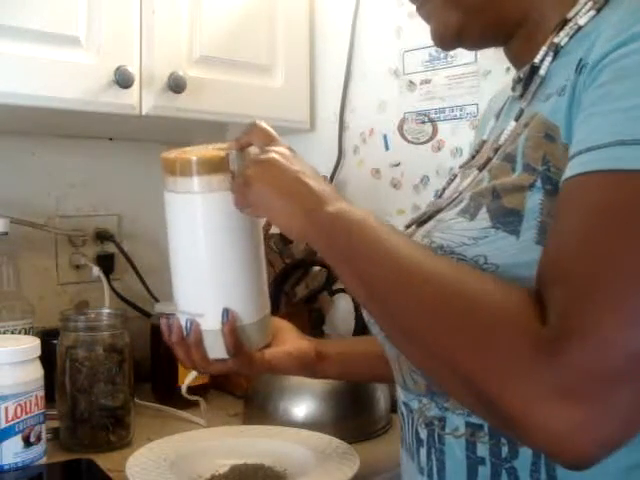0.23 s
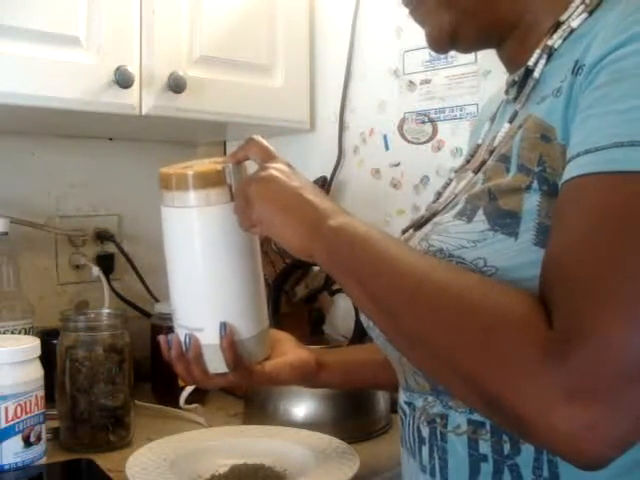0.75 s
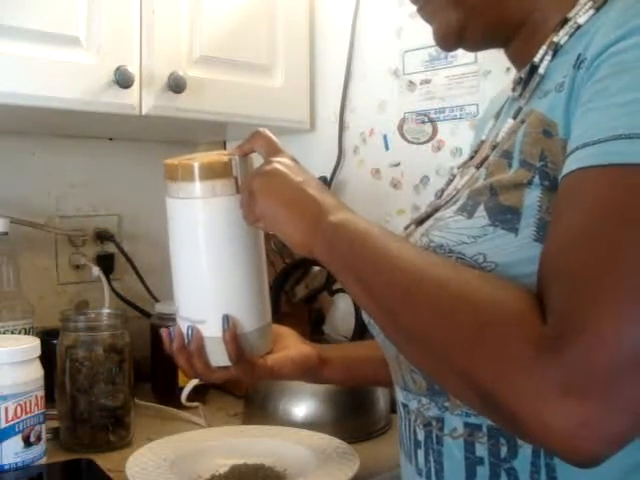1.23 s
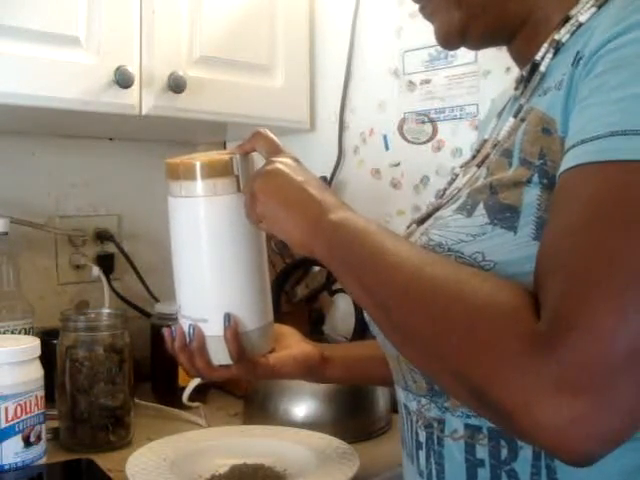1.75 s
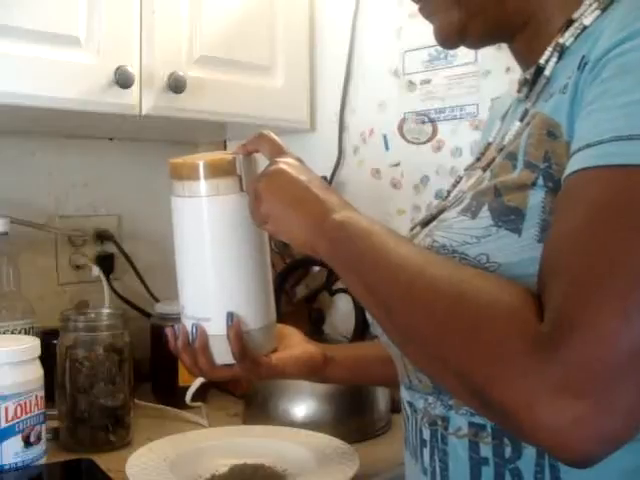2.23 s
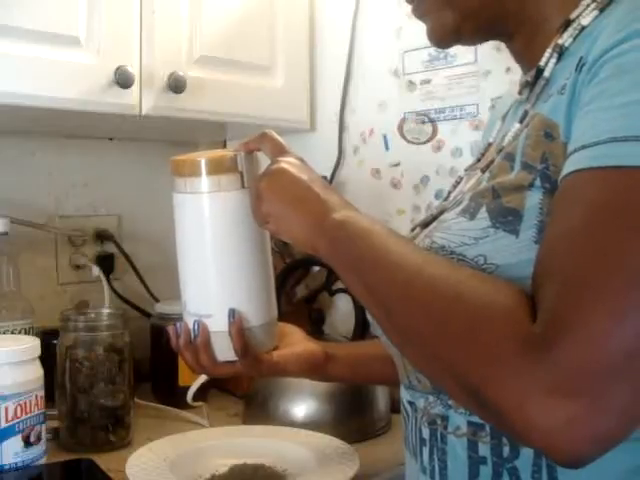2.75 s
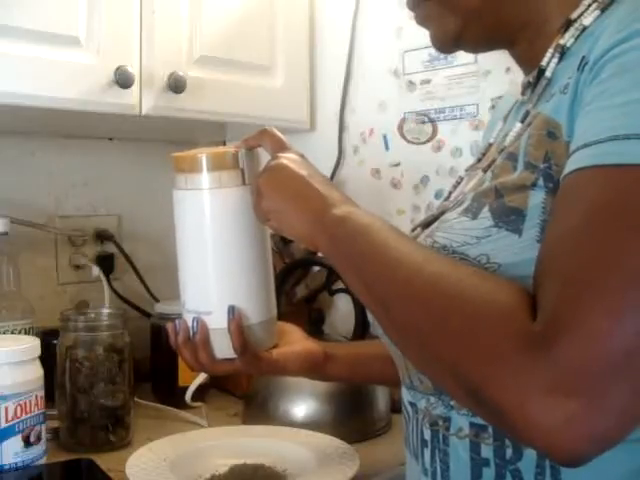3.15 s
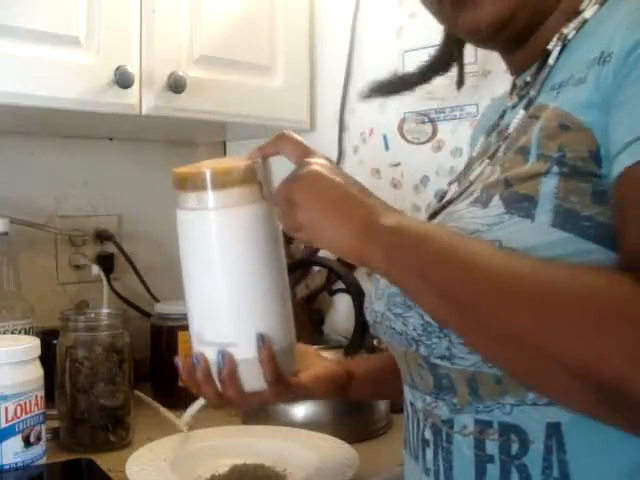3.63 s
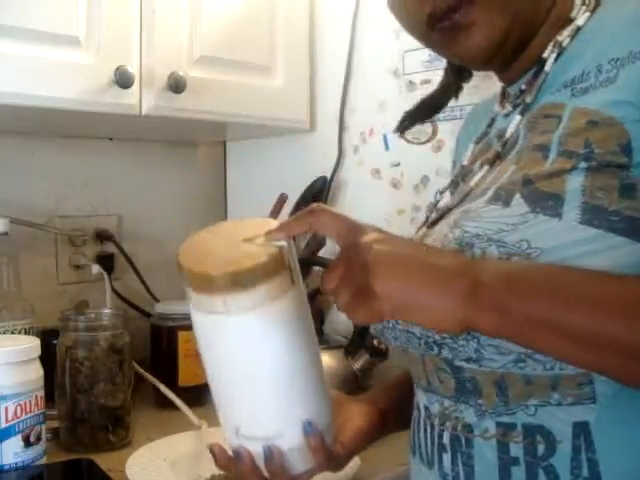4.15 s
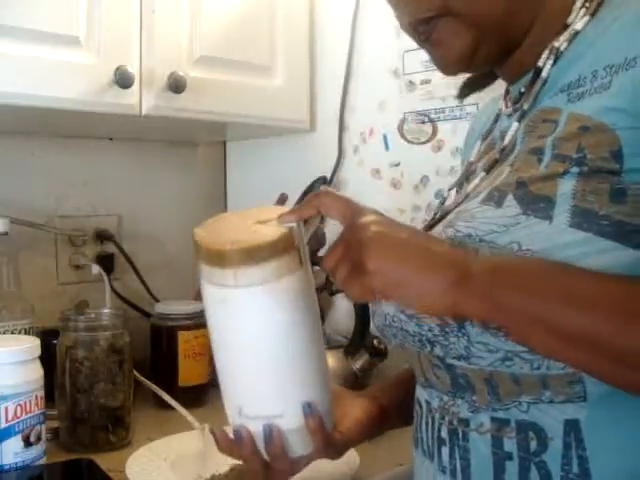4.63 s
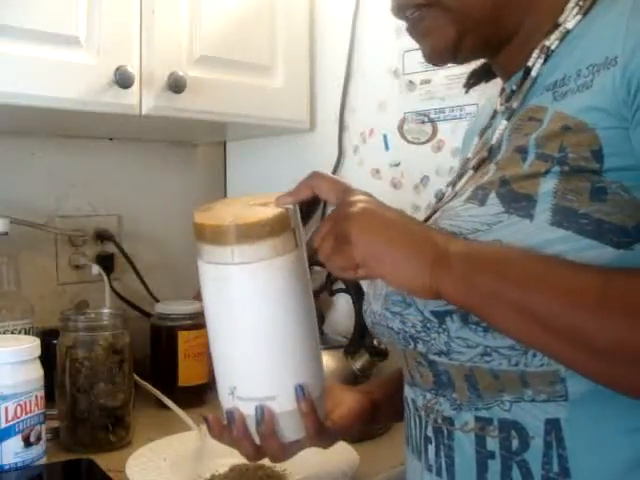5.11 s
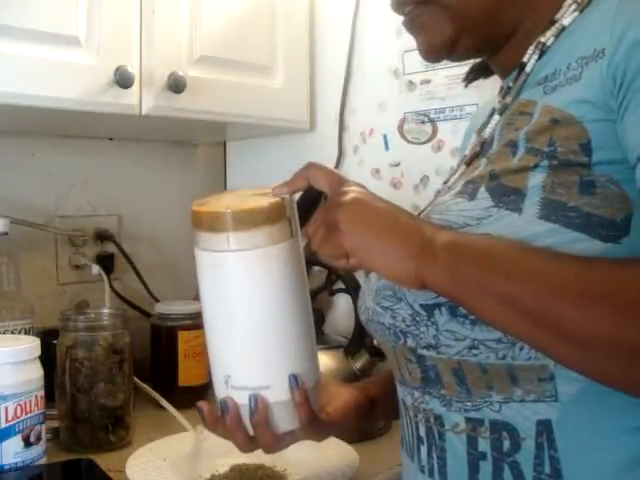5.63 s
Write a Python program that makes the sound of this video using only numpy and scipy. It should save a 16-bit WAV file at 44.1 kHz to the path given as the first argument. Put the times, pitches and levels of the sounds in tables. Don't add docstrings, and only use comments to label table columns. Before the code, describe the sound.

A hand-held electric blade grinder runs throughout, close to one microphone in a small kitchen. It is already whirring at 0 s, slightly under speed, and climbs gently to a steady pitch by about 1.2 s. The tone is a dense, nasal, buzzing whine with a fundamental near 350 Hz and strong overtones, roughened by small wavers. Under it, fine seeds hiss and tick against the steel cup in uneven clumps, with heavier bits rattling the housing and a sharp knock near 0.35 s. At about 3.6 s the button is let go: the whine slides down smoothly, overtones swelling and fading, with a quick cluster of hard knocks around 3.8 s. At 3.9 s power returns and the pitch swoops up, recovering by about 4.6 s amid clacks and dull thumps. Tilted, it continues brighter and slightly higher until cut off near 5.9 s. Room echo is short, treble limited, with faint rumble.

```python
import sys
import numpy as np
from scipy import signal
from scipy.fft import rfft, irfft, next_fast_len
from scipy.io import wavfile
from scipy.ndimage import uniform_filter1d, map_coordinates

SR = 44100
rng = np.random.default_rng(int(sys.argv[2]) if len(sys.argv) > 2 else 0)


def magnitude_from_level(level_db):
    exponent = np.asarray(level_db, float) / 20
    return 10 ** exponent


def store_wav(level_fs):
    pcm = np.round(np.clip(np.atleast_2d(level_fs), -1, 1) * 32767)
    wavfile.write(sys.argv[1], SR, pcm.T.astype(np.int16))


N = 259066

# (time [s], tilt [0-1], button [0-1])
HAND = [
    (0, .4, 1),
    (.8, 0, 0.73),
    (3.52, 0.02, 0.96),
    (3.58, 0.14, 0.25),
    (3.91, 0.04, 0),
    (3.95, 0.4, 0.6),
    (4.6, 0.74, 1),
    (5.0, 1, 1),
    (5.9, 1, 0.96),
]
# (frequency [Hz], level [dB])
ROOM_HUM = [(20, -1.5), (45, -2.5), (110, 8.5), (200, 9.5), (300, -13), (600, -52.5)]
LET_GO_S, PRESSED_S = 3.583, 3.921
FULL_SPEED_HZ = 350


def motor():
    # (order [1], lower mains line [dB], order level [dB], upper mains line [dB])
    upright = [(1, -62, -27.5, -82), (2, -51.5, -35.5, -45), (3, -48.5, -40.5, -40.5), (4, -45, -38, -47),
               (5, -54.5, -41, -39), (6, -40.5, -47.0, -51.5), (7, -62, -42.5, -41.5), (8, -59.5, -41, -48),
               (9, -54, -41.5, -55.5), (10, -49.5, -46.5, -52), (11, -61, -57, -42.5),
               (12, -44.5, -42.5, -49.5), (13, -54.5, -72.5, -57), (14, -53, -44.5, -46.5)]
    # (order [1], lower mains line [dB], order level [dB], upper mains line [dB])
    tilted = [(1, -54, -26.5, -76), (2, -57.5, -40.8, -57), (3, -47.5, -41, -40.5), (4, -38.5, -41.5, -38),
              (5, -39, -44, -41), (6, -40, -43, -47), (7, -58, -44.5, -44), (8, -41, -43, -44.5),
              (9, -38.5, -36.5, -44), (10, -50, -53, -46.5), (11, -49, -37.5, -43), (12, -55, -38.5, -51),
              (13, -50.5, -53, -46), (14, -58.5, -50, -43.5)]
    # (time [s], shift of the standing waves [%], looseness [dB])
    grip = [(0, 0.36, 0.5), (0.3, -0.068, 1), (0.55, 0.068, -3.5), (0.7, -0.01, 3.5), (1, -0.092, 1.9),
            (1.5, 0.24, -0.1), (2.2, -0.061, 0.3), (2.9, 0.33, 3.0), (3.3, 0.16, -0.3), (3.42, 0.44, 2.5),
            (3.53, -0.22, -3.5), (3.6, -0.0055, -1.4), (3.66, -0.18, 3), (3.76, 0.71, -7.5),
            (4.2, 0.17, 2.5), (4.7, -0.12, 0.5), (5.1, 0.072, 1), (5.87, 0.33, -1.2)]
    feels_grip = {4: 1, 5: .5, 6: 1, 7: 1, 8: 1, 9: .5}
    mains_pull_hz, commutator_bars = 120, 20
    high_order_share = 0.28
    chop_db, chop_full_hz = 4, 18

    t = np.arange(N) / SR
    hz = shaft_hz()
    slow = slowness(hz)
    tilt, button = curves(HAND)
    shift_percent, loose_db = curves(grip)
    turn = 2 * np.pi * np.cumsum(hz * (1 + 0.001215 * wobble(40))) / SR
    pull = 2 * np.pi * mains_pull_hz * t
    grid_hz = np.arange(5200.)
    standing_db = standing_waves_db(grid_hz)
    flare_db = 6 * np.exp(-((t - LET_GO_S - 0.068) / 0.042) ** 2)
    turn_db = -4 * np.clip((t - 3) / .15, 0, 1) * (1 - tilt)
    under_speed = np.clip((348 - hz) / chop_full_hz, 0, 1)

    out = np.zeros(N)
    for (k, *up_db), (_, *tilted_db) in zip(upright, tilted):
        low_db, mid_db, high_db = [a + (b - a) * tilt for a, b in zip(up_db, tilted_db)]
        glide_db = -25 * slow + shell_db(k * hz) - shell_db(k * 352)
        low_db = low_db + glide_db + 2.2 * wobble(12)
        high_db = high_db + glide_db + 1.2 * wobble(12)

        mid_db = mid_db - 42.5 * slow
        mid_db += (0.11 + 0.23 * abs(k - 4)) * wobble(9) + 0.81 * wobble(30)
        mid_db -= chop_db * (1 if k > 3 else .3) * under_speed * (abs(wobble(28)) - .55)
        mid_db += feels_grip.get(k, 0) * loose_db
        mid_db += (6 <= k <= 9) * flare_db + (k == 10) * turn_db
        share = 1 if k <= 10 else high_order_share
        mid_db += share * np.interp(k * hz * (1 + shift_percent / 100), grid_hz, standing_db)

        phase = rng.uniform(0, 2 * np.pi, size=3)
        out += magnitude_from_level(mid_db) * np.sin(k * turn + phase[0])
        out += button * magnitude_from_level(low_db) * np.sin(k * turn - pull + phase[1])
        out += button * magnitude_from_level(high_db) * np.sin(k * turn + pull + phase[2])
    brush_db = -60.5 + 11 * tilt ** 3 + 1.8 * wobble(5)
    out += magnitude_from_level(brush_db) * np.sin(commutator_bars * turn)
    return magnitude_from_level(4.0) * out


def shaft_hz():
    # (time [s], speed [Hz])
    loaded = [(0.0, 326), (0.174, 334), (0.52, 341.8), (0.846, 346), (1.262, 350.5), (1.52, 350.8),
              (1.98, 348.8), (2.213, 347.6), (2.302, 350.2), (2.68, 352.3), (3.13, 350.7), (3.375, 349.3),
              (3.57, 349.6), (4.353, 349.9), (4.857, 354.9), (5.02, 356.6), (5.464, 357.6), (5.87, 360.5)]
    # (time [s], change of speed [Hz], half length [s])
    slips = [
        (0.344, 4, 0.013),
        (0.928, 1.88, 0.04),
        (1.793, -3.5, 0.088),
        (1.823, 4, 0.052),
        (2.45, -1.5, 0.08),
        (2.947, 3, 0.059),
        (3.25, 3.5, 0.0733),
        (3.501, 3, 0.047),
        (4.977, 3, 0.067),
        (5.23, 1.7, 0.093),
    ]
    coast_hz_per_s, spin_up_s = 360.8, .24

    t = np.arange(N) / SR
    lost_hz = coast_hz_per_s * np.clip(t - LET_GO_S, 0, PRESSED_S - LET_GO_S)
    lost_hz *= np.exp(-np.clip(t - PRESSED_S, 0, None) / spin_up_s)
    slip_hz = sum(hz * np.exp(-((t - s) / half_s) ** 2) for s, hz, half_s in slips)
    return curves(loaded)[0] + slip_hz - lost_hz


def slowness(hz):
    return np.clip(1 - hz / FULL_SPEED_HZ, 0, 1)


def standing_waves_db(hz):
    # (frequency [Hz], width [Hz], gain [dB])
    crests = [(664, 9.1, 5), (994, 25, 7), (1028, 19.6, 7.5), (1082.0, 42.8, 19.0), (1355, 9.1, 9),
              (1400.8, 97, 19.0), (1444.4, 24, 12.8), (1689, 94, 11.5), (1786, 23, 11.5), (2101, 52, 16.6),
              (2504, 19, 6), (2804, 19.0, 6.5), (3183, 84.0, 14.7), (3519.0, 203, 19.5)]
    # (frequency [Hz], width [Hz], gain [dB])
    nodes = [(347.6, 13.6, -19), (694, 31.6, -15.5), (715, 2.1, -8), (1082.9, 16.5, -14), (1403, 6.1, -1.4),
             (1419.8, 13, -10), (1779, 20.3, -15), (2040, 14, -21.9), (2458.0, 10, -6), (2864, 44.0, -22.0),
             (3161.0, 13.3, -22), (3233, 63, -22.0), (3521, 50.4, -6), (253.6, 5.0, -12)]
    # (frequency [Hz], width [Hz], gain [dB])
    frame = [(233, 24.0, 6), (301.0, 4.0, 1.5), (596, 11, 5.1), (891, 262, 11), (1154, 70, 13.5),
             (1316.0, 8.0, 12.0), (1505, 85.0, 7.0), (1843.0, 73, 17.7), (1997, 56.0, 15.4), (2206, 125, 9),
             (2392.0, 17, 10.5), (2567, 100, 11.5), (2854, 76.0, 3.5), (3260, 14, 15)]
    return bumps_db(hz, crests + nodes + frame)


def shell_db(hz):
    # (frequency [Hz], width [Hz], gain [dB])
    shell = [(1340, 59, 6), (2100, 160, 0.5), (2650, 250, 13.5), (3164, 220, 14)]
    return bumps_db(hz, shell)


def seeds():
    # (frequency [Hz], level [dB])
    rattle_colour = [(1500, -34), (2500, -8), (3500, 0), (4200, -1.5), (5000, 1), (5600, 1), (6400, -0.5),
                     (7200, 0.5), (8300, -8), (10000, -8.5), (10400, -53)]
    # (frequency [Hz], level [dB])
    knock_colour = [(120, -27), (250, -20), (500, -14), (850, -13), (1000, -2.5), (1350, 0.5), (1580, -4),
                    (2200, 2.5), (2700, -3.5), (3300, -11), (4500, -21), (7000, -52.5)]
    # (frequency [Hz], width [Hz], level over the rattle [dB])
    cup_modes = [(4950, 77, -12.5), (6450, 410, 0), (7875, 120, 3.5), (8730, 102, 9), (9615, 70, 12)]
    # (frequency [Hz], width [Hz], level over the knocks [dB])
    housing_modes = [(235, 45, 6.1), (323, 16, 8.4), (1403, 47, 7.2), (3363, 120, 3.4)]
    # (frequency [Hz], width [Hz], level [dB])
    jam_modes = [(1200, 96, 9.5), (1330, 83, 18)]
    # (time [s], peak [dB])
    strikes = [(0.2483, -7), (0.3493, 1.5), (0.5317, -4), (1.064, -19), (1.3678, -1), (1.4726, 0.5),
               (1.497, -5), (2.166, -12), (2.2697, -4), (3.1911, 1), (3.2665, -6), (3.9258, -4),
               (4.0672, 0), (4.1096, -8), (4.2047, -5), (4.2594, -5), (4.3868, 3.5), (4.4323, 0), (4.57, 5),
               (4.6344, 2), (4.7121, -14), (4.9863, -2), (5.6396, -1), (5.8282, 0)]
    # (time [s], knock [dB], thump [dB])
    jam_events = [
        (.35, -11, -53),
        (3.78, -9, -58),
        (3.81, -15, -60),
        (3.835, -16, -63),
        (4.045, -18.5, -50),
        (4.385, -24, -46),
        (4.986, -30, -43),
        (5.64, -23, -45),
    ]

    rattle_db, knock_db = feed()
    cup, housing = ringing(rattle_colour, cup_modes), ringing(knock_colour, housing_modes)
    jammed = ringing(knock_colour, jam_modes)

    fine_hits = hail(16000, 1.4, -1.5, 60)
    fine = unit(filtered(patchy(fine_hits, 1.7, wide=4, long=2), cup))
    heavy_hits = hail(8000, 2, -4, 40)
    heavy = unit(filtered(patchy(heavy_hits, 1.2, wide=5, long=9), housing))

    ticks = filtered(bursts([(s, db - 5.5) for s, db in strikes], 0.015), cup)
    jams = filtered(bursts([(s, db - 4.5) for s, db, _ in jam_events], 0.15), jammed)
    thumps = filtered(bursts([(s, db + 11) for s, _, db in jam_events], 0.17), room_hum)
    return magnitude_from_level(rattle_db + 2.57) * fine + magnitude_from_level(knock_db) * heavy + ticks + jams + thumps


def feed():
    # (time [s], rattle [dB])
    reach = [(0, -23), (.4, -28), (.56, -24.5), (.68, -26), (.9, -29.5), (1.5, -27.5), (2, -28),
             (2.5, -29.5), (3, -27), (3.5, -30), (3.74, -28.5), (3.85, -27), (4.1, -26.5), (4.4, -25),
             (4.7, -30), (4.95, -30), (5.3, -28), (5.87, -27.5)]
    # (time [s], surge [dB])
    surges = [(.01, 2), (.16, 2.5), (.29, -4), (0.351, 6), (.66, 3), (.74, 1.5), (.94, 5), (1.06, 4),
              (1.36, -3), (1.49, -0.5), (1.89, 0), (2.02, 3.5), (2.16, 4.5), (2.26, 1.5), (2.331, 5.5),
              (2.58, 4), (2.99, 0.5), (3.26, 5.5), (3.53, 6.5), (3.778, 5), (3.93, 2), (4.1, 4), (4.201, 2),
              (4.28, 4), (4.48, -0.5), (4.629, 5.5), (4.75, 2.5), (4.979, 5), (5.409, 4.5), (5.63, -1)]
    rise_s, fall_s = 0.008, 0.055
    knock_start_db, knock_wear_db_per_s, knock_slow_db = -26, -0.53, -6.5
    knock_follows = 0.43

    t = np.arange(N) / SR
    rattle_db = curves(reach)[0]
    for s, db in surges:
        rise = np.clip((t - s) / rise_s, 0, 1)
        rattle_db = rattle_db + db * rise * np.exp(-np.clip(t - s - rise_s, 0, None) / fall_s)
    knock_db = knock_start_db + knock_wear_db_per_s * t + knock_slow_db * slowness(shaft_hz())
    knock_db += knock_follows * (rattle_db - rattle_db.mean())
    return rattle_db, knock_db


def hail(per_second, spread_db, clump_db, clumps_per_second):
    hit = rng.uniform(size=N) < per_second / SR
    starts = (rng.uniform(size=N) < clumps_per_second / SR) * rng.exponential(size=N)
    clumps = signal.lfilter([1], [1, -np.exp(-1 / (0.0088 * SR))], starts)
    size = magnitude_from_level(spread_db * rng.standard_normal(N))
    size *= 1 + magnitude_from_level(clump_db) * np.tanh(clumps)
    return hit * size * rng.standard_normal(N)


def bursts(events, t60_s):
    out, t = np.zeros(N + SR), np.arange(SR // 8) / SR
    for s, db in events:
        envelope = magnitude_from_level(db - 60 * t / t60_s) * (1 - np.exp(-t / 0.001))
        out[round(s * SR):][:len(t)] += envelope * rng.standard_normal(len(t))
    return out[:N]


def kitchen(x):
    # (frequency [Hz], t60 [s])
    decay = [(200, 0.96), (2000, 0.28), (10000, 0.4)]
    hz, t, z = signal.stft(rng.standard_normal(SR // 2), SR, nperseg=256)
    t60_s = along(decay, hz)[:, None]
    tail = signal.istft(z * magnitude_from_level(-60 * t / t60_s), SR, nperseg=256)[1]
    return signal.fftconvolve(np.pad(x, (200, 0)), tail / np.linalg.norm(tail))[:N]


def floor():
    tilt, _ = curves(HAND)
    rumble = unit(filtered(rng.standard_normal(N), room_hum))
    return magnitude_from_level(-69 + 5 * tilt + 1.1 * wobble(3)) * rumble


def room_hum(hz):
    return magnitude_from_level(along(ROOM_HUM, hz))


def unit(x):
    return x / np.sqrt(np.mean(x ** 2) + 1e-20)


def along(points, hz):
    f, v = np.transpose(points)
    return np.interp(np.log(hz + 1), np.log(f + 1), v)


def curves(rows):
    s, *cols = np.transpose(rows)
    return [np.interp(np.arange(N) / SR, s, c) for c in cols]


def wobble(rate_hz):
    knots = rng.standard_normal(int(N * rate_hz / SR) + 4)
    return map_coordinates(knots, [np.arange(N) * rate_hz / SR])


def bumps_db(hz, modes):
    return sum(db / (1 + (2 * (hz - c) / w) ** 2) for c, w, db in modes)


def filtered(x, response):
    m = next_fast_len(N + SR // 2)
    return irfft(rfft(x, m) * response(np.fft.rfftfreq(m, 1 / SR)), m)[..., :N]


def ringing(spectrum, modes):
    def response(f):
        peaks = sum(magnitude_from_level(db) * 1j * f * w / (c * c - f * f + 1j * f * w) for c, w, db in modes)
        return magnitude_from_level(along(spectrum, f)) * (1 + peaks)
    return response


def patchy(x, patchy_db, wide, long):
    z = signal.stft(x, nperseg=256)[2]
    field = uniform_filter1d(rng.standard_normal(z.shape), wide, 0)
    field = uniform_filter1d(field, long, 1)
    return signal.istft(z * magnitude_from_level(patchy_db * unit(field)), nperseg=256)[1][:N]


def scene():
    whine, rattle = motor(), seeds()
    mono = whine + magnitude_from_level(-20) * kitchen(whine)
    mono += rattle + magnitude_from_level(-12) * kitchen(rattle) + floor()
    return np.array([mono, mono])


def thin_treble(x, from_hz=4400, under_db=-5, left_db=-24):
    hz, _, z = signal.stft(x, SR, nperseg=512)
    bands = z[:256].reshape(32, 8, -1)
    power = np.mean(abs(bands) ** 2, axis=1)
    around = uniform_filter1d(power, size=15, axis=1)
    dropped = (power < around * magnitude_from_level(under_db) ** 2) & (hz[:256:8, None] > from_hz)
    z[:256] *= np.repeat(np.where(dropped, magnitude_from_level(left_db), 1), 8, axis=0)
    return signal.istft(z, SR, nperseg=512)[1][:N]


def top_cut(x):
    return signal.sosfilt(signal.butter(12, 10570, fs=SR, output="sos"), x)


def record(dry):
    top_hz = 10170
    soft = dry[0] / (1 + abs(dry[0] / .7) ** 6) ** (1 / 6)
    mono = filtered(thin_treble(soft), lambda hz: np.clip((top_hz - hz) / 160, 0, 1))
    return top_cut(np.array([mono, mono]))


dry = scene()
out = record(dry)
store_wav(out)
```